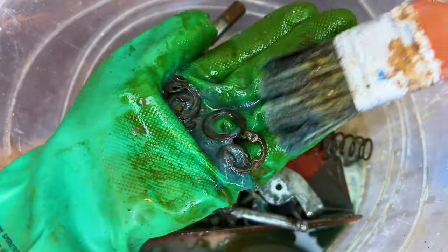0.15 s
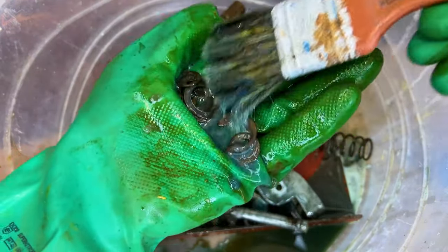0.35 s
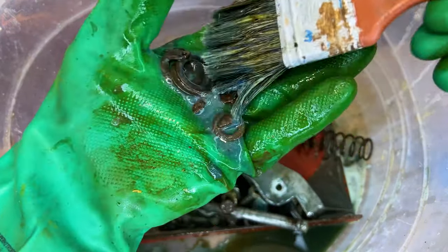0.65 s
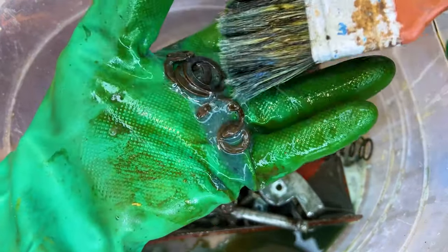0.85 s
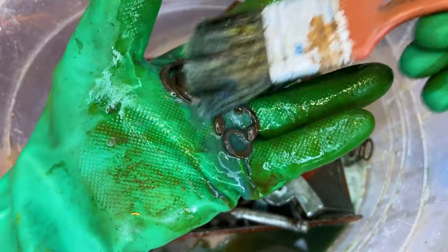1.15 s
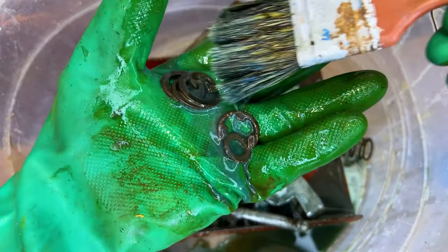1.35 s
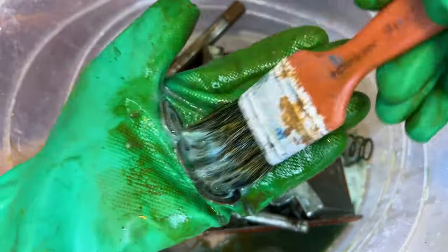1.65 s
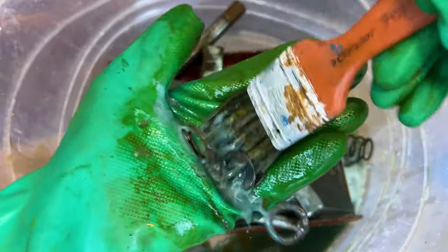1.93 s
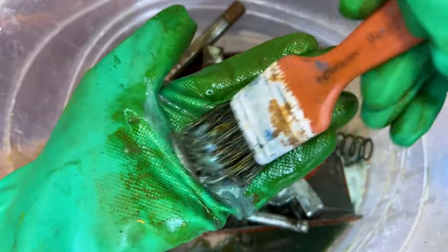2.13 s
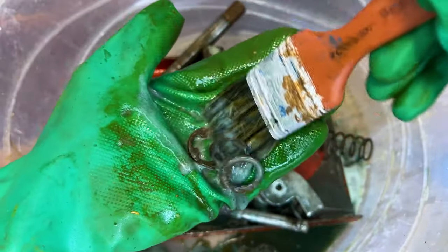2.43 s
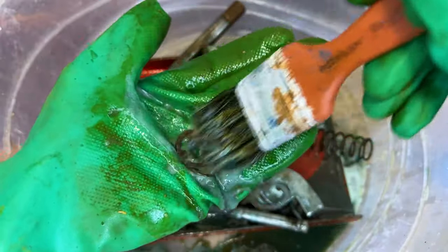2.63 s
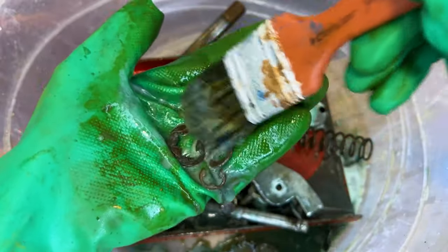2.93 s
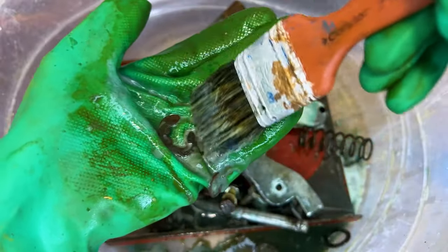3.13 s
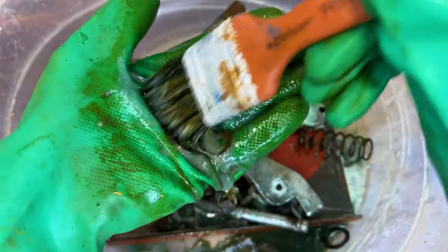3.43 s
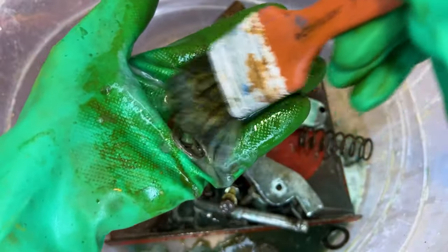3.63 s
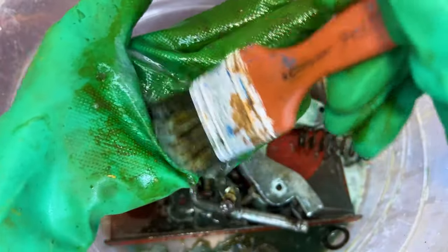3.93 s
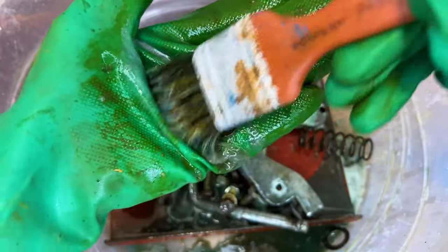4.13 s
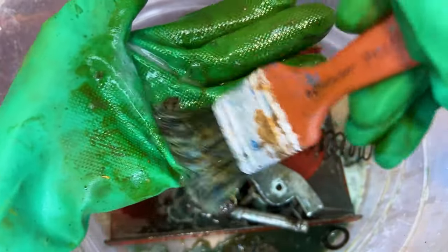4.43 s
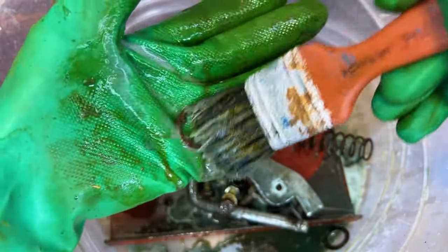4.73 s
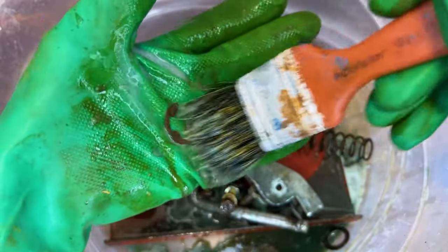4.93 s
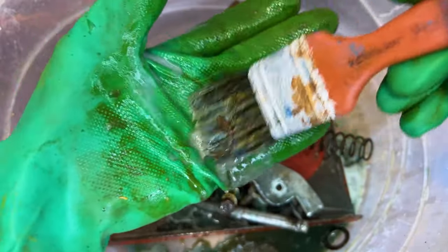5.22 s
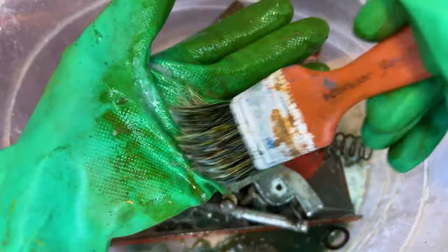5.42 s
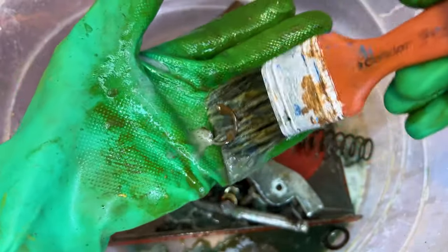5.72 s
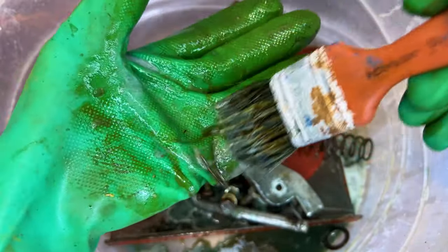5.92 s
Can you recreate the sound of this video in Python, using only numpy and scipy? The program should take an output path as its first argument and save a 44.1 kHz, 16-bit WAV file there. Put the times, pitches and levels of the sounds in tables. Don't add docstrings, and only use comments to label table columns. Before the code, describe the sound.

A wet bristle brush dabs and scrubs small steel rings in a rubber-gloved palm, rings clinking and clattering into a plastic tub.

```python
import sys
import numpy as np
from scipy import signal
from scipy.fft import rfft, irfft, next_fast_len
from scipy.io import wavfile
from scipy.ndimage import uniform_filter1d

SR = 44100
rng = np.random.default_rng(int(sys.argv[2]) if len(sys.argv) > 2 else 0)


def volts_from_db(level):
    exponent = np.asarray(level, float) / 20
    return 10 ** exponent


def generate_wav(sig):
    pcm = np.round(np.clip(np.atleast_2d(sig).T, -1, 1) * 32767).astype(np.int16)
    wavfile.write(sys.argv[1], SR, pcm)


N = 267671

# (frequency [Hz], density [dB per Hz])
AIR_SPECTRUM = [(29, -11), (50, -14), (179, -12), (238, -16), (467, -17.5), (566, -20.5), (623, -20),
                (873, -22), (1280, -25), (4160, -30.5), (5040, -24), (6110, -35), (9880, -34),
                (15600, -34.5)]
# (frequency [Hz], gain [dB])
AIR_SIDE_SPECTRUM = [(25, -5), (125, -10), (800, -10.5), (3500, -19.5), (5000, -0.5), (7200, 2),
                     (8800, -1.5), (9500, -25)]
AIR_DB, RUMBLE_FLOOR_DB = -68.5, -79
# (time [s], half width [s], level [dB])
RUMBLE_SWELLS = [
    (.3, 0.37, -85),
    (1.7, 0.204, -89),
    (2.1, 0.46, -68),
    (2.95, 0.38, -75),
    (3.572, .2, -74),
    (4.3, .2, -71),
]
# (time [s], half width [s], level [dB], frequency [Hz])
MOTOR_LOADS = [(.4, 0.38, -73.5, 38.04), (1.449, 0.18, -76, 151), (2.05, 0.175, -70, 155),
               (2.65, 0.068, -72, 196.4), (2.95, 0.18, -68, 152.4), (3.6, .3, -76, 136.8),
               (4.55, 0.4, -68.5, 142.2), (5.3, 0.12, -77.5, 149.2), (4.6, .5, -83, 118),
               (5.751, 0.4, -74.5, 120.1), (5.5, 0.4, -76.5, 75)]
HUM_WAVER_HZ = 2.34

# (frequency [Hz], density [dB per Hz])
BRISTLE_SPECTRUM = [(2650, -22), (4500, -11), (5480, -16.5), (6820, -11.5), (8020, -7), (11000, -2),
                    (12300, -4.5), (15600, -19)]
# (frequency [Hz], density [dB per Hz])
GLOVE_SPECTRUM = [(240, -64), (400, -13.5), (439, -13.5), (482, -56), (630, -10), (1840, -3), (2710, -8.5),
                  (4220, -9), (5460, -22), (6500, -13.5), (8450, -51), (14300, -120)]
FLICKS_PER_S = 12000
FLICK_SPREAD_DB = 1.2
BUNCH_DB, BUNCH_SPAN_S = 1.15, .012
HISS_PATCH_DB, RUB_PATCH_DB = 1.7, 2.1
# (start [s], length [s], bristle hiss [dB], glove rub [dB])
DABS = [(0, 0.0086, -63.5, -69), (0.186, 0.076, -60, -72), (0.254, 0.15, -55, -58.5),
        (0.562, .15, -56.5, -63), (0.742, 0.04, -65.5, -71.5), (0.958, 0.2, -58.5, -68),
        (1.202, 0.051, -56.5, -64), (1.279, 0.076, -57, -69), (1.454, 0.038, -57, -67),
        (1.506, 0.036, -53.5, -69), (1.561, 0.017, -49.5, -54.5), (3.224, 0.089, -52, -57.5)]
LAND_S, SAG_DB_PER_S, LIFT_DB_PER_S = 0.02, 23, 330
# (hardest at [s], half width [s], bristle hiss [dB], glove rub [dB])
STROKES = [(1.671, 0.026, -50, -49.5), (1.803, 0.03, -48.5, -56), (1.92, 0.04, -65, -56.5),
           (2.06, 0.016, -43.5, -54), (2.4, 0.07, -54, -59.5), (2.582, 0.033, -50.5, -57),
           (2.713, 0.036, -54, -57), (2.82, 0.024, -55.5, -64), (3.09, 0.036, -55.5, -72),
           (3.53, 0.11, -53.5, -59.5), (3.63, .025, -61, -76), (3.7, 0.022, -50.5, -68),
           (3.8, 0.067, -54, -59), (3.94, 0.032, -52, -76), (4.06, 0.16, -52, -60),
           (4.41, 0.11, -54.5, -56), (4.52, 0.085, -51.5, -66), (4.728, .028, -51.5, -69),
           (4.82, 0.16, -56.5, -62.5), (5.009, 0.039, -52, -68), (5.09, 0.0064, -52, -58.5),
           (5.169, 0.032, -53, -57.5), (5.33, 0.091, -55.5, -62.5), (5.43, 0.032, -54, -61.5),
           (5.64, 0.11, -55, -63), (5.78, 0.016, -75, -63), (5.89, 0.043, -55, -61),
           (6.07, 0.02, -54.5, -68)]
DOWN_S = 1.57
RESTING_DB, LIFTED_DB = (-57.5, -63.5), (-76, -83)

# (time [s], level [dB])
SNAPS = [(.104, -59), (.76, -64), (.7721, -52), (.7864, -58), (.8092, -52), (0.829, -58), (.855, -65),
         (1.1196, -52), (1.1618, -56), (1.475, -44.5), (2.7665, -53), (4.514, -50), (4.827, -49),
         (5.169, -38.5), (6.034, -56)]
SNAP_TICK_HZ = 11000
# (time [s], steel tick [dB], crack [dB], tick frequency [Hz])
CLINKS = [(.2094, -52, -68, 13000), (.255, -46, -67, 10300), (0.2686, -28.5, -48, 8660),
          (0.2756, -31.5, -52, 10900), (0.33, -43, -38.5, 8520), (0.3402, -33, -41, 8850),
          (0.359, -34, -42, 10700), (0.3628, -32, -59, 11860), (0.98, -42, -69, 12300),
          (0.9871, -31, -47.5, 8230), (1.0005, -37, -48.5, 8850), (1.0046, -36, -50, 12200),
          (1.2257, -36.5, -51, 8760), (1.23, -29.5, -40, 9400), (1.2384, -53, -57, 12500),
          (1.334, -35, -49, 10400), (1.8205, -32, -44, 8550), (1.8785, -39, -46, 8050),
          (2.189, -18.5, -32, 8900), (2.3322, -39, -56, 11200), (2.3466, -48, -42, 8450),
          (2.6652, -36.5, -52, 9100), (2.992, -23, -30, 8600), (3.5527, -33, -43.5, 11400),
          (3.6422, -35, -58, 11200), (3.6526, -35, -37, 11200), (3.8064, -43, -65, 12000),
          (4.48, -39, -65, 8900), (5.3634, -46, -60, 10000), (5.68, -39, -51, 10300)]
CLINK_THUD_DB, CLINK_THUD_HZ = -11, 2200
# (time [s], thud [dB], steel tick [dB], thud frequency [Hz])
KNOCKS = [(0.608, -53.5, -44, 1210), (.6142, -51, -48, 624), (1.1, -54.5, -49, 990),
          (1.6364, -49, -60, 2210), (1.8582, -47, -66, 1600), (2.2515, -27, -37, 1890),
          (2.2755, -40, -54, 1530), (2.3159, -38, -31.5, 867), (2.918, -29, -58, 1230),
          (3.087, -40.5, -58, 1150), (3.108, -46, -56, 1400), (3.2253, -46, -58, 1090),
          (4.2117, -25, -46, 1910), (4.2656, -31.5, -43, 1310), (4.3074, -33.5, -39, 2400),
          (4.3324, -41.5, -54, 1210), (5.64, -57, -60, 290), (3.975, -51, -60, 697),
          (4.645, -49, -47, 1040), (5.09, -76, -44, 1390), (5.6356, -45.5, -42, 1530)]
KNOCK_CRACK_DB, KNOCK_TICK_HZ = -10, 11200
# (time [s], steel tick [dB], crack [dB], thud [dB], thud frequency [Hz])
DROPS = [
    (2.0658, -10, -16, -22, 1410),
    (2.0901, -33, -50, -30.5, 1180),
    (2.1164, -10, -16, -13, 1220),
    (2.13, -14, -30, -19, 1310),
    (2.833, -11.5, -13, -18, 830),
    (2.8557, -23, -26, -29, 2080),
    (2.882, -35, -32, -32, 2400),
    (4.154, -9, -14.5, -16.5, 2050),
]
DROP_TICK_HZ = 10300
TICK_HZ, CRACK_HZ, THUD_HZ = (7000, 13800), (2310, 5510), (485, 3180)
THUD_BELOW, THUD_ABOVE = .6, 2.1
# (frequency [Hz], level [dB], t60 [s])
TUB_MODES = [(387, -4, 0.19), (463, -31, 0.16), (760, -36, 0.15), (867, -6, 0.035), (1200, 12.5, 0.069),
             (1277, 1, 0.15), (1405, 14, 0.034), (1667, 8.5, 0.13), (1740, 6, 0.073), (2405, 18.5, 0.04)]
WALL_HZ = (380, 3000)
BASS_CUT_HZ = 420

# (time [s], frequency [Hz], level [dB], t60 [s])
NOTES = [(2.191, 8400, -37, .26), (2.191, 11205, -38, .15), (2.1897, 10490, -42, .12),
         (2.993, 8755, -52, .3), (.362, 12310, -54, .3), (1.232, 12378, -53, .2), (1.232, 12446, -55, .2),
         (2.993, 8660, -38, .06), (.215, 4700, -64, .1), (3.553, 390, -55, .1), (3.655, 300, -59, .07),
         (3.972, 520, -57, .08), (4.1535, 441, -32, .16), (.269, 8600, -36, .03), (.341, 8470, -46, .1),
         (1.005, 12200, -46, .08), (1.005, 8400, -50, .1), (2.117, 8450, -34, .08), (2.155, 8700, -38, .04),
         (2.346, 8200, -36, .014), (3.651, 11100, -42, .04), (3.655, 4950, -54, .15), (2.12, 72, -54, .5),
         (2.85, 76, -53, .4), (4.17, 74, -52, .35), (4.16, 170, -50, .3), (2.12, 150, -56, .35),
         (2.12, 390, -31, .2), (2.118, 1368, -30, .15), (2.833, 800, -32, .08), (2.856, 8700, -36, .04),
         (1.23, 2290, -41, 0.017), (1.8798, 1500, -43, 0.015), (2.0674, 1180, -24, 0.043),
         (2.0663, 2000, -29, 0.046), (2.118, 2580, -22.5, 0.026), (2.1165, 680, -33, 0.19),
         (2.1305, 867, -32, 0.036), (4.155, 396, -39, 0.2), (2.13, 1304, -24.5, 0.12),
         (2.8337, 857, -29, 0.038), (2.833, 1400, -25.5, 0.042), (2.8328, 2690, -22.5, 0.035),
         (2.833, 3840, -21.5, 0.024), (2.8327, 4320, -25, 0.042), (2.9922, 3000, -41, 0.029),
         (4.1542, 884, -25, 0.04), (4.1542, 2254, -24, 0.023), (4.1541, 4090, -19.5, 0.015),
         (2.191, 8460, -40, .3), (2.255, 11205, -53, .35), (2.993, 8730, -39, 0.061),
         (1.23, 4200, -42, .018), (.268, 1450, -54, .03), (.2686, 3500, -52, .05), (.33, 4000, -46, .015),
         (.34, 1200, -52, .03), (.359, 1500, -43, .015), (.359, 4100, -44, .015), (3.6525, 2900, -42, .025),
         (3.642, 9000, -46, .04),
         (2.1302, 1350, -12, .012), (2.1168, 1300, -12, .014), (.413, 900, -56, .01),
        (.675, 1200, -55, .008), (.675, 3000, -57, .008), (2.886, 3000, -26, .006), (4.176, 1500, -30, .02),
        (4.232, 1300, -34, .02), (4.278, 2000, -36, .02), (1.6366, 2220, -41.5, .03),
        (1.6366, 4570, -46, .015), (1.8202, 2030, -43, .012), (1.8586, 1590, -40, .012),
        (1.8776, 2200, -43, .015), (3.087, 1300, -37, .015), (3.108, 1400, -42, .015),
        (3.557, 9000, -42, .015), (4.311, 1300, -35, .015), (4.646, 1090, -42, .012),
        (5.088, 1410, -50, .012), (5.135, 2050, -51, .015), (5.302, 1500, -50, .012),
        (5.401, 1570, -44, .015), (5.514, 1630, -51, .012), (5.634, 1110, -46, .015),
        (5.665, 1980, -48, .015), (5.76, 1180, -49, .03), (5.886, 1770, -49, .015),
        (5.937, 1500, -49, .012)]
# (time [s], frequency [Hz], level [dB], t60 [s])
HEAP = [(2.118, 621, -35, 0.22), (2.118, 736, -29, .08), (2.118, 1018, -31, .13), (2.118, 1733, -34, .15),
        (2.118, 1938, -37, .2), (2.068, 620, -37, .05), (2.068, 1440, -30, 0.044),
        (2.253, 398.6, -43, 0.18), (2.253, 730, -33, .04), (2.253, 1935, -39, .06), (2.833, 764, -29, .09),
        (2.918, 789, -38, .04), (2.945, 820, -42, .08), (2.862, 390, -42, .05), (4.154, 790, -24, .035),
        (4.154, 1180, -25, .04), (4.154, 1483, -32.5, .06), (4.154, 1947, -33, .06),
        (4.2648, 860, -42, .03), (4.19, 830, -36, .15), (4.18, 330, -44, .1), (2.17, 800, -34, .15),
        (2.07, 330, -40, .1), (4.2116, 1400, -38, .03), (4.309, 1600, -38, .04), (4.309, 2900, -40, .02),
        (4.309, 4200, -40, .015)]
RING_BEAT, HEAP_BEAT, HEAP_BEAT_HZ = .4, .8, 31

# (frequency [Hz], t60 [s])
ROOM_T60 = [(70, 3.3), (200, 0.63), (500, 0.41), (1500, 0.56), (4000, 0.38), (8000, 0.44), (15000, 0.31)]
# (frequency [Hz], gain [dB])
ROOM_SPECTRUM = [(60, -4), (160, 8), (260, 3), (500, 1), (2000, 0.5), (6000, 2), (15000, -8.5)]
BENCH_DB, BENCH_T60_S = 16.5, 0.018
# (time [s], level [dB], length [s], frequency
# [Hz])
SWISHES = [(.80, -67, 0.044, 11300), (1.93, -46.5, 0.014, 9850), (1.671, -48, 0.011, 2060),
           (3.14, -54, 0.059, 1110), (3.77, -57.5, 0.021, 1990), (4.731, -58.5, 0.037, 1900),
           (4.971, -60.5, .03, 1900), (5.169, -61, 0.023, 1900), (5.43, -58.5, 0.025, 2190),
           (5.671, -61, 0.029, 1900), (5.901, -66, 0.025, 1710), (3.99, -59, 0.039, 1940),
           (1.876, -52, .012, 2000), (1.888, -55.5, .01, 3400), (2.862, -35.5, 0.021, 2300),
           (2.865, -40, 0.024, 4300), (2.886, -43.5, .02, 6500), (3.331, -63, 0.069, 850),
           (3.536, -57, .018, 2400), (4.9, -61, .025, 1800), (5.77, -61, .018, 1250), (.61, -65, .015, 350),
           (.35, -62, .05, 1350), (3.66, -64, .03, 400), (2.16, -38, .03, 950)]
DIP_HZ, DIP_WIDTH_HZ, DIP_SHARE = 5850, 1700, 0.57


def evened(x):
    return x / np.sqrt(np.mean(x ** 2) + 1e-20)


def peaked(x):
    return x / abs(x).max()


def read(points, hz):
    f, value = np.transpose(points)
    return np.interp(np.log(hz + 1), np.log(f + 1), value)


def add(mix, time_s, sound):
    part = mix[round(time_s * SR):][:len(sound)]
    part += sound[:len(part)]


def colour(x, points):
    size = next_fast_len(len(x))
    gain = volts_from_db(read(points, np.fft.rfftfreq(size, 1 / SR)))
    return irfft(rfft(x, size) * gain, size)[:len(x)]


def band(x, lo_hz, hi_hz):
    sos = signal.butter(2, [lo_hz, min(hi_hz, 20000)], "bandpass", fs=SR, output="sos")
    return signal.sosfilt(sos, x)


def resonate(x, hz, width_hz):
    pole = np.exp((2j * np.pi * hz - np.pi * width_hz) / SR)
    return signal.lfilter([1], [1, -pole], x + 0j).real


def swells(time_s, width_s, level_db):
    t = np.arange(0, N / SR + .01, .001)
    bells = np.exp(-((t - time_s[:, None]) / width_s[:, None]) ** 2)
    return t, volts_from_db(level_db)[:, None] ** 2 * bells


def hum():
    time_s, width_s, level_db, hz = np.transpose(MOTOR_LOADS)
    t, power = swells(time_s, width_s, level_db)
    at, out = np.arange(N) / SR, np.zeros(N)
    for f, p in zip(hz, power):
        drift = evened(uniform_filter1d(rng.standard_normal(len(t)), 80))
        waver = np.interp(at, t, drift)
        level = np.interp(at, t, np.sqrt(2 * p)) * (1 + 0.45 * waver)
        out += level * np.sin(2 * np.pi * np.cumsum(f + HUM_WAVER_HZ * waver) / SR)
    return out


def air():
    mid_noise, side_noise, low_noise = rng.standard_normal((3, N))
    mid = colour(mid_noise, AIR_SPECTRUM)
    level = volts_from_db(AIR_DB) / np.sqrt(np.mean(mid ** 2))
    side = colour(colour(side_noise, AIR_SPECTRUM), AIR_SIDE_SPECTRUM) * level
    t, power = swells(*np.transpose(RUMBLE_SWELLS))
    rumble_level = np.sqrt(power.sum(0) + volts_from_db(RUMBLE_FLOOR_DB) ** 2)
    rumble = evened(band(low_noise, 7.1, 51.7)) * np.interp(np.arange(N) / SR, t, rumble_level)
    side = side + 0.2 * np.roll(rumble, SR // 3)
    return mid * level + rumble + hum() + np.array([side, -side])


def flutter(span_s):
    size = max(round(span_s * SR), 2)
    return evened(uniform_filter1d(uniform_filter1d(rng.standard_normal(N), size), size))


def patchy(x, depth_db, bins=3, frames=4):
    z = signal.stft(x, nperseg=256)[2]
    field = rng.standard_normal(z.shape[::-1])
    field = uniform_filter1d(uniform_filter1d(field, bins, 1), frames, 0)
    return signal.istft(z * volts_from_db(depth_db * evened(field).T), nperseg=256)[1][:N]


def pressure(column):
    time_s, width_s, *stroke_db = np.transpose(STROKES)
    t, power = swells(time_s, width_s, stroke_db[column])
    contact_db = np.where(t > DOWN_S, RESTING_DB[column], LIFTED_DB[column])
    power = power.sum(0) + volts_from_db(contact_db) ** 2
    for start_s, length_s, *dab_db in DABS:
        u = t - start_s
        fall_db = SAG_DB_PER_S * u + LIFT_DB_PER_S * np.maximum(u - length_s, 0)
        landing = np.clip(u / LAND_S, 0, 1)
        power = power + (landing * volts_from_db(dab_db[column] - np.clip(fall_db, 0, 90))) ** 2
    return np.interp(np.arange(N) / SR, t, np.sqrt(power))


def brush():
    sizes = volts_from_db(FLICK_SPREAD_DB * np.minimum(rng.exponential(1, (2, N)), 6))
    slips = rng.random((2, N)) < FLICKS_PER_S / SR
    flicks = slips * rng.standard_normal((2, N)) * sizes
    bunches = volts_from_db(BUNCH_DB * flutter(BUNCH_SPAN_S))
    hiss = patchy(colour(flicks[0], BRISTLE_SPECTRUM), HISS_PATCH_DB, bins=8, frames=10)
    rub = patchy(colour(flicks[1], GLOVE_SPECTRUM), RUB_PATCH_DB)
    return (evened(hiss) * pressure(column=0) + evened(rub) * pressure(column=1)) * bunches


def blows():
    snaps = [(s, db, db - 11, db - 37, SNAP_TICK_HZ, CLINK_THUD_HZ) for s, db in SNAPS]
    clinks = [(s, tick, crack, crack + CLINK_THUD_DB, hz, CLINK_THUD_HZ)
              for s, tick, crack, hz in CLINKS]
    knocks = [(s, tick, thud + KNOCK_CRACK_DB, thud, KNOCK_TICK_HZ, hz)
              for s, thud, tick, hz in KNOCKS]
    drops = [(s, tick, crack, thud, DROP_TICK_HZ, hz) for s, tick, crack, thud, hz in DROPS]
    return snaps + clinks + knocks + drops


def tub_wall(push, shift):
    wall = np.zeros(len(push))
    for (hz, db, t60_s), luck in zip(TUB_MODES, shift):
        wall += volts_from_db(db) * resonate(push, hz * (1 + 0.0285 * luck), 2.2 / t60_s)
    return peaked(band(wall, *WALL_HZ))


def impact(tick_db, crack_db, thud_db, tick_hz, thud_hz, luck):
    t = np.arange(luck.shape[1]) / SR
    contact = t / np.array([[.0004], [.0006], [.0009]])
    steel, edge, push = luck[:3] * contact * np.exp(-contact)
    tick = peaked(band(steel, *TICK_HZ)) + 2.14 * peaked(resonate(steel, tick_hz, 670))
    crack = peaked(band(edge, *CRACK_HZ))
    knock = peaked(band(push, THUD_BELOW * thud_hz, THUD_ABOVE * thud_hz))
    knock = knock + 0.61 * peaked(band(resonate(push, thud_hz, 134), *THUD_HZ))
    wall_db = -6 + 0.25 * (thud_db + 20.5)
    thud = knock + volts_from_db(wall_db) * tub_wall(push, luck[3])
    near = [volts_from_db(tick_db - 6.5) * tick, volts_from_db(crack_db + 3.0) * crack, volts_from_db(thud_db - 1.0) * thud]

    click = 1. * (t == 0)
    low = band(click, *THUD_HZ)
    far = [band(click, *TICK_HZ), band(click, *CRACK_HZ), low + .04 * resonate(low, thud_hz, 700)]
    fed = sum(f * np.linalg.norm(n) / np.linalg.norm(f) for n, f in zip(near, far))
    return band(sum(near), BASS_CUT_HZ, SR / 2), fed


def ringing(hz, level_db, t60_s, beat, beat_hz):
    t = np.arange(SR // 2) / SR
    twin = 1 + beat * np.cos(2 * np.pi * beat_hz * t)
    build = np.minimum(t * hz / 4, 1)
    return volts_from_db(level_db - 60 * t / t60_s) * np.sin(2 * np.pi * hz * t) * build * twin


def parts():
    near, far = np.zeros(N), np.zeros(N)
    for time_s, *blow in blows():
        direct, click = impact(*blow, rng.standard_normal((4, 4000)))
        add(near, time_s, direct)
        add(far, time_s, click)
    notes = [(s, ringing(hz, db, t60_s, RING_BEAT, .0016 * hz))
             for s, hz, db, t60_s in NOTES]
    notes += [(s, ringing(hz, db, t60_s, HEAP_BEAT, HEAP_BEAT_HZ + .02 * hz))
              for s, hz, db, t60_s in HEAP]
    for time_s, note in notes:
        add(near, time_s, note)
        add(far, time_s, .41 * note)
    return near, far


def room(x):
    hz, t, z = signal.stft(rng.standard_normal(SR), SR, nperseg=512)
    gain_db = read(ROOM_SPECTRUM, hz)[:, None] - 60 * t / read(ROOM_T60, hz)[:, None]
    tail = signal.istft(z * volts_from_db(gain_db), SR, nperseg=512)[1]
    t = np.arange(len(tail)) / SR
    bench = tail * volts_from_db(BENCH_DB - 60 * t / BENCH_T60_S) * (t > .0015)
    tail = tail * np.clip(t / 0.012 - .2, 0, 1) + band(bench, BASS_CUT_HZ, SR / 2)
    return signal.fftconvolve(x, tail / np.linalg.norm(tail))[:N]


def swishes():
    out = np.zeros(N)
    t = np.arange(-4500, 4500) / SR
    for time_s, level_db, length_s, hz in SWISHES:
        puff = evened(band(rng.standard_normal(len(t)), hz * 0.837, hz * 1.19))
        add(out, time_s + t[0], volts_from_db(level_db) * puff * np.exp(-(t / length_s) ** 2))
    return out


def scene():
    near, far = parts()
    clanks = near + volts_from_db(-1.0) * room(far)
    dip = signal.lfilter(*signal.iirpeak(DIP_HZ, DIP_HZ / DIP_WIDTH_HZ, SR), clanks)
    return air() + brush() + clanks - DIP_SHARE * dip + swishes()


def top_cut(x):
    return signal.sosfilt(signal.butter(12, 16710, fs=SR, output="sos"), x)


def record(dry):
    edge = signal.firwin(401, 15780, window=("kaiser", 7), fs=SR)
    mix = signal.oaconvolve(dry, edge[None], "same")
    return top_cut(mix)


dry = scene()
out = record(dry)
generate_wav(out)
```